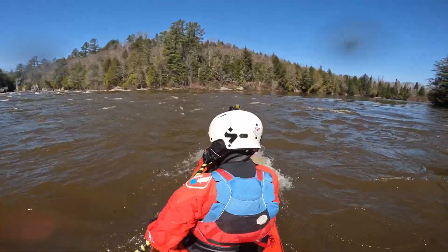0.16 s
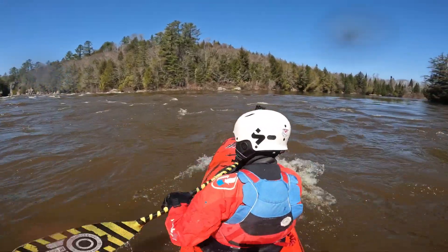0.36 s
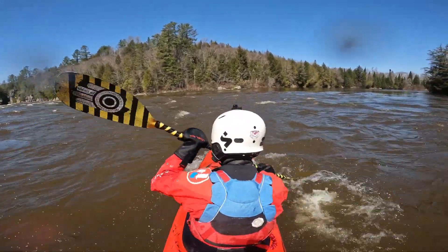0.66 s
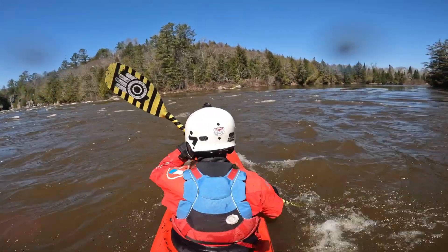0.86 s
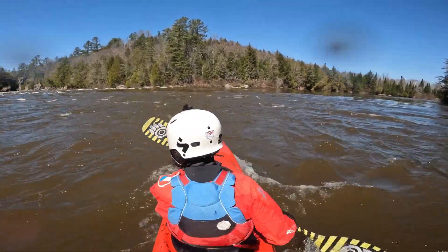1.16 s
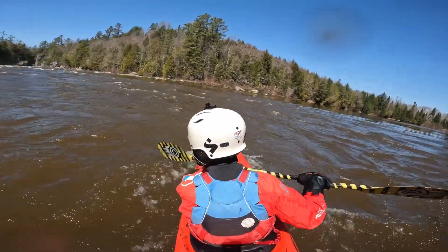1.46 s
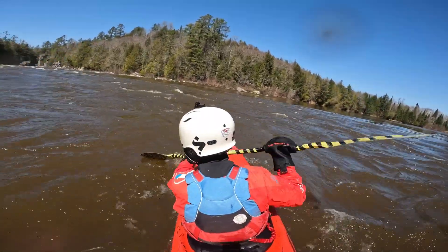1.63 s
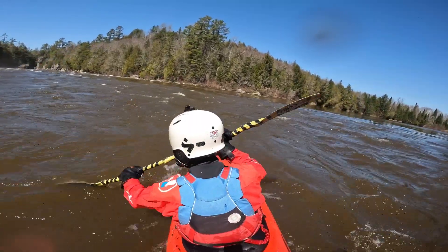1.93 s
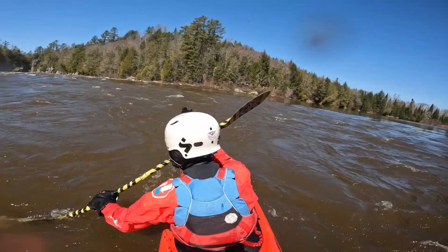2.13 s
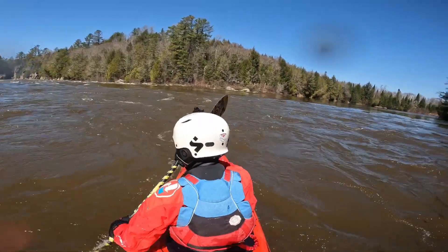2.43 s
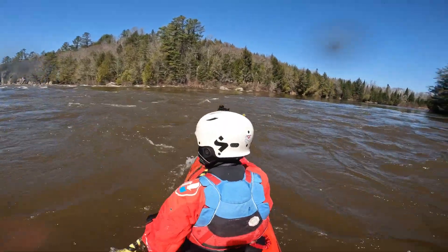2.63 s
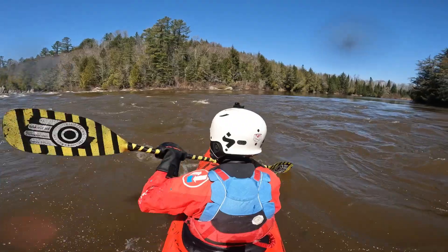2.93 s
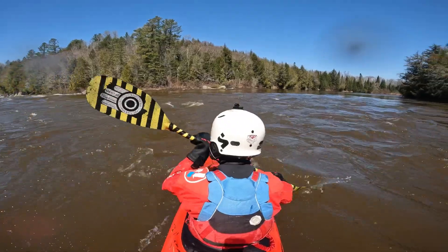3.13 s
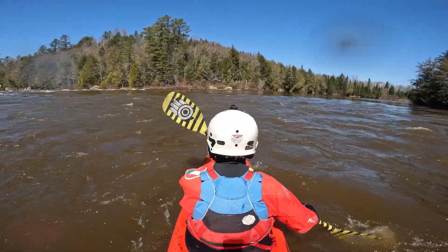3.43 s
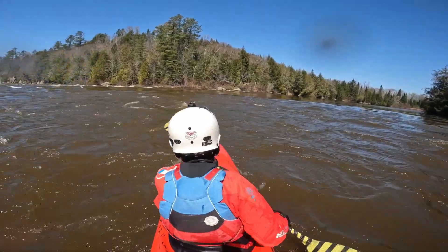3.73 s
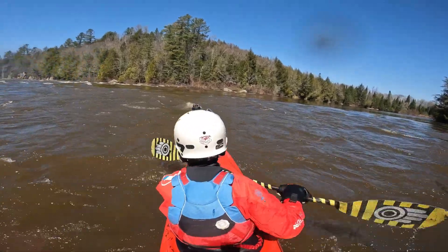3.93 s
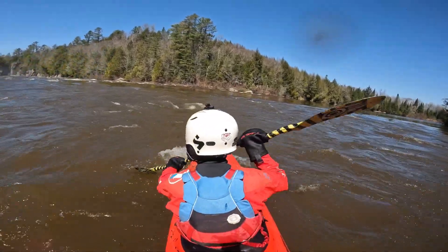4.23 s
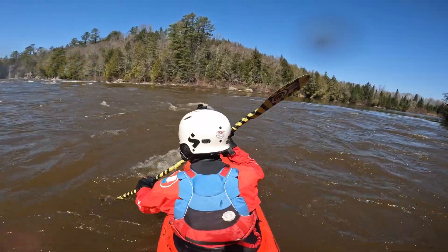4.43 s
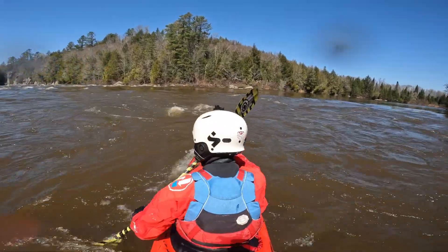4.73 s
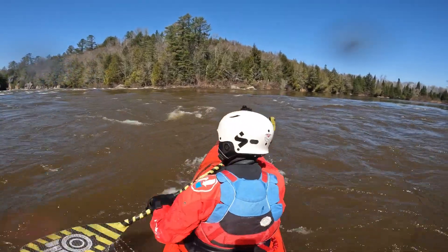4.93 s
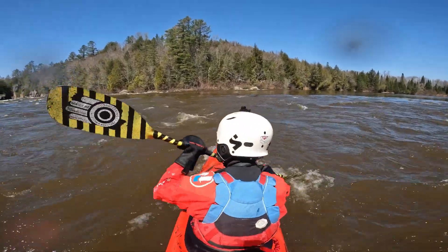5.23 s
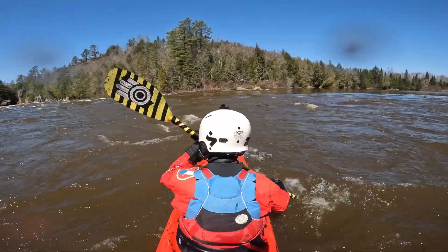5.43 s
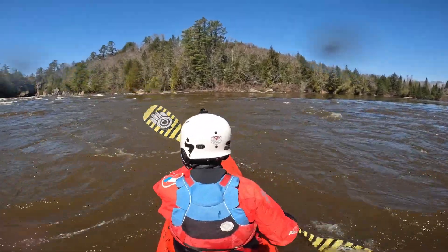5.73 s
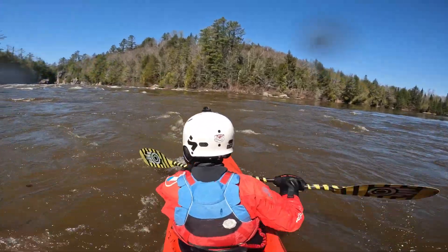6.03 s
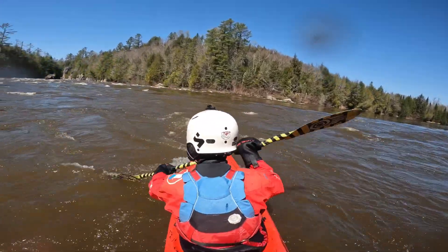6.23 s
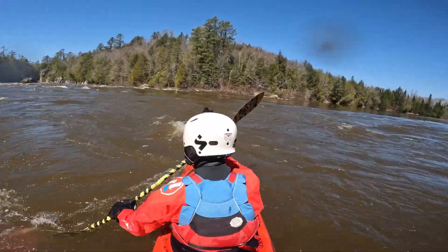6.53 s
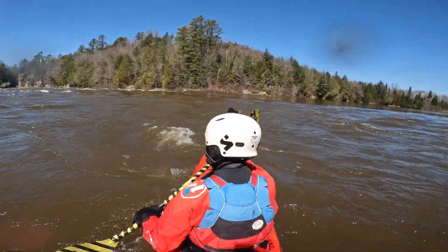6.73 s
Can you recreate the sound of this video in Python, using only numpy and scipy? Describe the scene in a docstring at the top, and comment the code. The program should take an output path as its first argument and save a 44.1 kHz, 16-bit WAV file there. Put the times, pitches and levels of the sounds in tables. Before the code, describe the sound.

A brief rush of rapids and buffeting wind gives way to low rumble, hollow gurgles and slaps as a kayak is paddled along.

```python
"""Whitewater rushes and fizzes around a kayak while wind buffets the microphone on its stern and flung
drops tick on the camera. After a second the rush dies away and leaves a muffled rumble: water churned
by the paddle gurgles and booms under the hollow plastic hull, small waves slap it, and showers patter
on the deck. The water is noise and ringing air bubbles; hull and deck lend it their resonances."""
import sys
import numpy as np
from scipy.fft import rfft, irfft, next_fast_len
from scipy.io import wavfile
from scipy.ndimage import map_coordinates

SR = 44100
rng = np.random.default_rng(int(sys.argv[2]) if len(sys.argv) > 2 else 0)


def unload_audio(sound):
    """Save the sound as a 16-bit wav file, at the path given as the first command line argument."""
    columns = np.transpose(np.atleast_2d(sound))
    # keep every value between -1 and 1, then stretch to whole-number steps
    steps = np.round(np.clip(columns, -1, 1) * 32767)
    wavfile.write(sys.argv[1], SR, steps.astype(np.int16))


N = 302967
TIME = np.arange(N) / SR


def amp(db):
    """Decibels to gain."""
    return 10 ** (np.asarray(db) / 20)


def unit(x):
    """x at rms 1."""
    return x / np.sqrt(np.mean(x ** 2) + 1e-20)


def curves(rows):
    """One automation curve for each column after the time."""
    times, *columns = np.transpose(rows)
    return [np.interp(TIME, times, column) for column in columns]


def wobble(rate):
    """A smooth random curve, rate knots a second."""
    return map_coordinates(rng.standard_normal(int(N * rate / SR) + 4), [TIME * rate])


def swell(at, length):
    """A bell-shaped rise and fall, length seconds wide."""
    return np.exp(-2 * ((TIME - at) / length) ** 2)


def swells(rows, rest_db, stretch=1):
    """Gain of a steady bed with swells on top: (time [s], level [dB], length [s])."""
    power = sum((amp(db) * swell(at, stretch * length)) ** 2 for at, db, length in rows)
    return np.sqrt(amp(rest_db) ** 2 + power)


def filtered(x, response):
    """x through a gain given as a function of frequency."""
    size = x.shape[-1]
    padded = next_fast_len(size + SR // 2)
    return irfft(rfft(x, padded) * response(np.fft.rfftfreq(padded, 1 / SR)), padded)[..., :size]


def lowpass(x, edge_hz, order):
    """x with the treble rolled off above the edge."""
    return filtered(x, lambda f: 1 / (1 + (f / edge_hz) ** order))


def coloured(x, eq):
    """x through an EQ curve of (frequency [Hz], gain [dB]), at rms 1."""
    hz, db = np.transpose(eq)
    return unit(filtered(x, lambda f: amp(np.interp(np.log(f + 1), np.log(hz), db))))


def ring(x, modes, edge_hz):
    """x through a body's resonances; soft plastic damps all above the edge."""
    def response(f):
        body = sum((-1) ** k * amp(db) * 1j * f * width / (hz * hz - f * f + 1j * f * width)
                   for k, (hz, width, db) in enumerate(modes))
        return body / (1 + 1j * np.sqrt(2) * f / edge_hz - (f / edge_hz) ** 2) ** 2
    return filtered(x, response)


def bubble(t, hz, cycles, rise):
    """A pocket of air rings down 40 dB over some cycles, its pitch rising as it nears the surface."""
    age = t * hz / cycles
    tone = np.sin(2 * np.pi * hz * t * (1 + rise * age / 2))
    return tone * np.exp(-np.log(100) * age) * (1 - np.exp(-2 * t * hz))


def bubbles(count, hz, spread, cycles, scatter_db, samples):
    """A cloud of bubbles of random time, pitch and strength, at rms 1."""
    when, pitch_a, pitch_b, rarity = np.hsplit(rng.random((count, 4)), 4)
    pitch = hz * np.exp(spread * (pitch_a + pitch_b - 1))
    strength = amp(-scatter_db * np.log(np.maximum(rarity, np.exp(-4))))
    waves = strength * bubble(np.arange(samples) / SR, pitch, cycles, rise=0.17)
    at = (when * N).astype(int) + np.arange(samples)
    return unit(np.bincount(at.ravel(), waves.ravel(), N)[:N])


def add(track, at, sound):
    """Mix a sound into the track at a time in seconds."""
    part = track[max(round(at * SR), 0):][:len(sound)]
    part += sound[:len(part)]


# Faders of the rapid, ahead of the fade-out: (time [s], roar level [dB], spray level [dB])
RAPID_LEVELS = [(0.05, -33.5, -39), (0.28, -30.5, -36), (0.36, -27, -36), (0.57, -30, -32.5),
                (0.8, -30.5, -36), (0.97, -29.5, -35)]
# Full low-mid body of tumbling water: (frequency [Hz], gain [dB])
ROAR_EQ = [(80, -33), (160, 0.5), (220, 4), (380, -3.5), (550, -7.5), (700, -6), (900, -6.5), (1500, -12.5),
           (2500, -22), (6000, -62)]
# Bright sizzle of foam: (frequency [Hz], gain [dB])
SPRAY_EQ = [(400, -39), (1200, 0.5), (2000, -2.5), (3300, -1), (5400, -4.5), (6300, -9.5), (7350, -20.5),
            (8700, -33.5), (11000, -43.5), (15000, -64.5)]

def whitewater(leave_s=0.97, roar_fade_db_per_s=48.5, spray_fade_db_per_s=50.5):
    """Tumbling water roars and its foam bursts in spray; both die away as the boat leaves the rapid."""
    roar_db, spray_db = curves(RAPID_LEVELS)
    gone_s = np.maximum(TIME - leave_s, 0)
    tumble = rng.standard_normal(N)
    tumble += 0.27 * bubbles(count=5000, hz=659, spread=1.2, cycles=12.1, scatter_db=3, samples=900)
    foam = rng.standard_normal(N)
    foam += 0.38 * bubbles(count=7000, hz=3204, spread=1, cycles=14, scatter_db=1, samples=250)
    roar = amp(roar_db - roar_fade_db_per_s * gone_s + 0.66 * wobble(25)) * coloured(tumble, ROAR_EQ)
    lingering_fizz = amp(-29.5 - 23 * gone_s)
    spray_fade = np.hypot(amp(-spray_fade_db_per_s * gone_s), lingering_fizz)
    spray = spray_fade * amp(spray_db + 1.25 * wobble(33.62)) * coloured(foam, SPRAY_EQ)
    return roar + spray


# Gusts on the microphone: (time [s], level [dB])
GUST_LEVELS = [(0.04, -21), (1.2, -26.5), (1.31, -35), (1.39, -34.5), (1.49, -42.5), (2.42, -44),
               (2.47, -37.5), (4.34, -37), (4.49, -46), (4.55, -38.5), (5.54, -41), (5.58, -51),
               (6.01, -31.5), (6.58, -35), (6.7, -43.5), (6.87, -33.5)]
# Bass-heavy wind rumble: (frequency [Hz], gain [dB])
BUFFET_EQ = [(10, -22.5), (25, -1.5), (65, -2.5), (100, -4), (150, -8.5), (250, -23.5), (450, -32.5),
             (1000, -53.5), (3000, -92)]

def wind():
    """Eddies shake the microphone in quick low lumps."""
    gust_db, = curves(GUST_LEVELS)
    lumps = amp(1.6 * wobble(14))
    return amp(gust_db) * unit(lumps * coloured(rng.standard_normal(N), BUFFET_EQ))


# Dull bed of distant water: (frequency [Hz], gain [dB])
RIVER_EQ = [(100, 3.5), (450, -6.5), (750, 2), (1300, -2), (2000, -9), (3200, -10.5), (4200, -15),
            (6000, -20), (8000, -32), (10000, -70.5)]

def open_river():
    """The open river washes softly under everything, flecked with small bubbles."""
    ripples = rng.standard_normal(N)
    ripples += 0.19 * bubbles(count=900, hz=3020, spread=0.8, cycles=19, scatter_db=3, samples=400)
    return amp(-64 + 0.38 * wobble(7)) * coloured(ripples, RIVER_EQ)


def air():
    """A barely audible steady hiss, independent in each channel."""
    eq = [(150, -10), (700, -1), (2500, -0.5), (6000, 0.5), (7600, -2.5), (9000, -16.5)]
    return amp(-92.5) * coloured(rng.standard_normal((2, N)), eq)


def stereo_widening(peak_s=1.27, peak_db=-56.5, rise_db_per_s=14.5, fall_db_per_s=25.5):
    """A faint noise in opposite phase in the two channels swells briefly around 1.3 s, bright at first and then
    deeper, and fades again."""
    since_s = TIME - peak_s
    level_db = peak_db + np.minimum(rise_db_per_s * since_s, -fall_db_per_s * since_s)
    bright_eq = [(300, -31), (1500, -23.5), (6500, -2), (8500, -9), (11000, -37)]
    deep_eq = [(40, -9), (250, -11), (600, -14), (1500, -20.5), (5000, -28.5), (8000, -48), (11000, -70)]
    bright = coloured(rng.standard_normal(N), bright_eq)
    deep = coloured(rng.standard_normal(N), deep_eq)
    crossfade = np.interp(TIME, [1.08, 1.2], [0, 1])
    return amp(level_db) * ((1 - crossfade) * bright + crossfade * deep) * np.array([[1], [-1]])


# Drop hits on the camera: (time [s], level [dB], ring pitch [Hz])
DROP_HITS = [(0.0203, -12, 1800), (.0240, -8, 3250), (.284, -12.5, 2220), (0.561, -16, 3360),
             (.610, -15, 2340), (1.183, -28, 5330), (2.425, -52, 4470), (3.560, -49.5, 12350),
             (3.651, -51, 3500), (4.336, -52.5, 13250), (5.437, -51.5, 4580)]

def drops():
    """Flung drops burst on the camera with a short wet tick; the finest reach only the left port."""
    track = np.zeros(N)
    t = np.maximum(np.arange(-SR // 200, SR // 40) / SR, 0)
    lead_in_s = np.sum(t == 0) / SR
    for at, db, hz in DROP_HITS:
        crack = rng.standard_normal(len(t)) * amp(-60 * t / 0.031) * (1 - np.exp(-t / 0.00028))
        tick = bubble(t, hz, cycles=8.8, rise=0.04) + 0.5 * crack
        add(track, at - lead_in_s, amp(db) * lowpass(tick, 1.73 * hz, order=10))  # water has no hard edge
    coarse = lowpass(track, 6800, order=16)
    fine = track - lowpass(track, 11300, order=30)
    return np.array([coarse + fine, coarse])


# Hollow resonances of the hull: (frequency [Hz], bandwidth [Hz], gain [dB])
HULL_MODES = [(163, 10, 3.5), (212, 44, -7), (242.8, 22.4, -5), (306.9, 19.8, -6), (432.7, 25.4, -10.5),
              (610.4, 7.3, -19.5)]
# Surges of water along the hull: (time [s], level before trim [dB], pocket pitch [Hz], length [s])
HULL_SURGES = [(0.367, -26, 205, 0.087), (.41, -28, 287, 0.11), (2, -41.5, 302.6, 0.074),
               (2.207, -49, 159.4, 0.1), (2.43, -42, 166.4, 0.083), (2.682, -28.5, 212, 0.052),
               (2.84, -30.5, 181.7, 0.1), (3.01, -34, 167.2, 0.11), (3.117, -40, 305, 0.091),
               (3.466, -33.5, 163, 0.094), (3.615, -33.5, 163.7, 0.062), (3.845, -33, 168.5, 0.075),
               (4.015, -34, 161.2, 0.1), (4.296, -37, 163.3, 0.089), (4.774, -33.5, 221.6, 0.18),
               (5.108, -33.5, 164.9, 0.12), (5.353, -31.5, 197, 0.11), (5.853, -31.5, 222, 0.12),
               (6.155, -36.5, 215, 0.28), (6.42, -32, 167.7, 0.22), (6.854, -31.5, 235.5, 0.03)]

def churn(trim_db=-4.5):
    """Bubbles gurgle against the hull: gently all the time, harder around each surge."""
    surges = [(at, db + trim_db, length) for at, db, _, length in HULL_SURGES]
    gurgle = bubbles(count=700, hz=231.2, spread=0.91, cycles=8.5, scatter_db=1, samples=2600)
    gurgle += 4 * rng.standard_normal(N)
    return swells(surges, rest_db=-47.5, stretch=1.31) * unit(ring(gurgle, HULL_MODES, edge_hz=810))


def pocket_booms(trim_db=-5.5):
    """Each surge pulls a large pocket of air under; it booms, its pitch wandering as it deforms."""
    track = np.zeros(N)
    wandering_time = np.cumsum(np.exp(0.05 * wobble(45))) / SR
    for at, db, hz, length in HULL_SURGES:
        tone = np.sqrt(2) * np.sin(2 * np.pi * (hz * wandering_time + rng.random()))
        track += amp(db) * swell(at, length) * tone
    return track * amp(trim_db + 2 * wobble(70))


# Puffs of fine spray: (time [s], level [dB], length before stretch [s])
MIST_PUFFS = [(.62, -67.5, 0.057), (3.1, -68.5, 0.29), (3.55, -60.5, 0.068), (3.8, -67.5, 0.58),
              (5.4, -70, .25), (6.82, -65, 0.14)]
# Thin sheen at the very top: (frequency [Hz], gain [dB])
MIST_EQ = [(9000, -53.5), (10800, -34.5), (11300, -19), (11900, -4.5), (12400, -2.5), (13200, -4.5),
           (14400, -23), (15600, -14.5)]

def mist():
    """Fine spray crackles beside the left microphone port, a steady fizz with puffs on top."""
    fizz = rng.standard_normal(N)
    fizz += 0.5 * bubbles(count=2500, hz=12500, spread=0.2, cycles=7, scatter_db=3, samples=60)
    gain = swells(MIST_PUFFS, rest_db=-72.5, stretch=0.92) * amp(0.8 * wobble(30))
    return gain * coloured(fizz, MIST_EQ) * np.array([[1], [0]])


# Stiff resonances of the deck: (frequency [Hz], bandwidth [Hz], gain [dB])
DECK_MODES = [(608.7, 21, 10), (730, 33, -5.5), (814, 22, -0.5), (1026, 22, -2.5), (1192, 100, 0),
              (1291, 54, 2.5), (1534, 150, -5)]
# Wave hits on the hull: (time [s], level [dB], trapped air pitch [Hz], thump relative to level [dB])
WAVE_SLAPS = [(1.208, -25.5, 1300, -9), (1.678, -37, 325, 0), (1.916, -38, 420, -6),
              (2.104, -41.5, 600, -9), (2.169, -39, 720, -5), (2.205, -35.5, 1095, 1.5),
              (2.425, -41, 723, -5), (2.652, -35.5, 600, 4), (2.678, -39.5, 606, 1),
              (2.729, -44.5, 1430, -3), (2.834, -38, 760, -4), (2.938, -42.5, 1290, 11.5),
              (2.990, -32, 436, 5), (3.087, -33, 810, -4), (3.096, -37, 1220, 8.5), (3.39, -38.5, 1255, -1),
              (3.53, -36, 1385, -4.5), (3.62, -44.5, 1340, 0), (5.065, -42.5, 630, 5),
              (5.153, -43.5, 1480, -4), (5.215, -35.5, 1310, 6.5), (5.712, -43, 627, 10),
              (5.819, -31.5, 430, 5.5), (5.936, -41, 1000, 4), (6.167, -32.5, 1350, -1.5),
              (6.222, -38, 1290, -9), (6.277, -37.5, 900, 8), (6.356, -40.5, 1350, 2)]

def slaps(decay_s=0.063, plop_db=-6, rattle_db=-12):
    """A wave traps air against the boat: the pocket plops, the deck rattles and the hull thumps."""
    track, t = np.zeros(N), np.arange(SR // 5) / SR
    normalised = lambda x: x / np.abs(x).max()
    for at, db, hz, thump_db in WAVE_SLAPS:
        burst = rng.standard_normal(len(t)) * amp(-60 * t / decay_s)
        wet = lowpass(burst, 1.21 * hz, order=6)  # water is a soft hammer
        plop = normalised(ring(wet, [(hz, 0.098 * hz, 0)], edge_hz=3300))
        plop += 0.43 * bubble(t, hz, cycles=14, rise=0.093)
        rattle = normalised(ring(wet, DECK_MODES, edge_hz=2300))
        knock = bubble(t, 260 * np.exp(0.13 * rng.standard_normal()), cycles=4, rise=0.067)
        thump = normalised(ring(knock, HULL_MODES, edge_hz=1300))
        add(track, at, amp(db) * (amp(plop_db) * plop + amp(rattle_db) * rattle + amp(thump_db) * thump))
    return track


# Showers on the deck: (time [s], level [dB], length [s])
DECK_SHOWERS = [(1.5, -57, 0.2), (2.86, -55.5, 0.35), (3.5, -61.5, 0.32), (5.23, -56, 0.29),
                (5.92, -60.5, 0.46), (6.26, -48.5, 0.17)]

def showers():
    """Water thrown by paddle and bow patters on the deck in swells, over a faint steady wash."""
    patter = bubbles(count=1600, hz=1100, spread=0.86, cycles=9.8, scatter_db=3.5, samples=700)
    patter += 2.2 * rng.standard_normal(N)
    return swells(DECK_SHOWERS, rest_db=-66) * unit(ring(patter, DECK_MODES, edge_hz=2360))


def scene():
    """Water and wind sit near the centre of the stereo mix."""
    beds = whitewater() + wind() + open_river() + air() + stereo_widening()
    return beds + drops() + churn() + pocket_booms() + mist() + slaps() + showers()


def record(dry, top_hz=15720):
    """The camera keeps nothing above its band limit."""
    return filtered(dry, lambda hz: hz < top_hz)


dry = scene()
out = record(dry)
unload_audio(out)
```